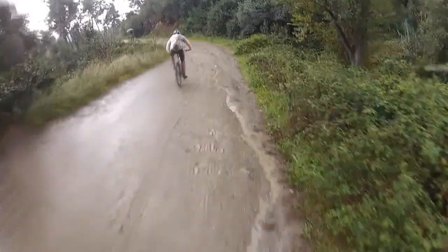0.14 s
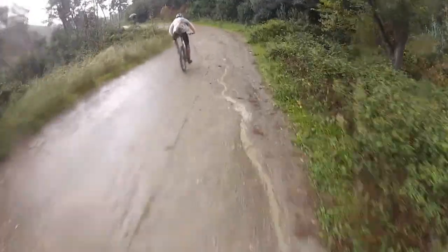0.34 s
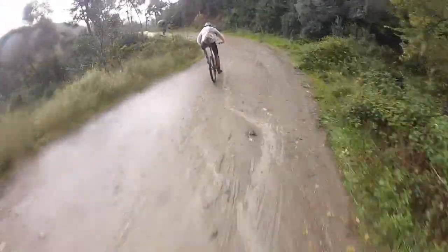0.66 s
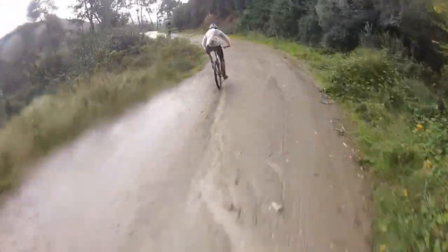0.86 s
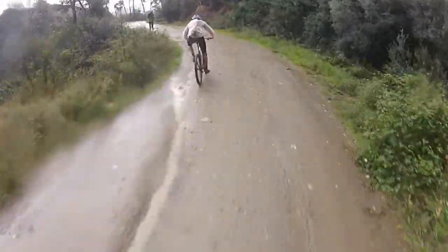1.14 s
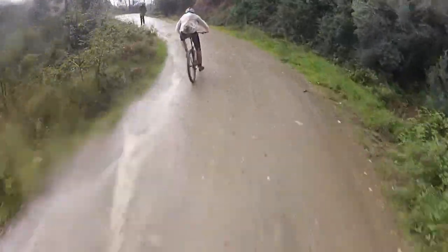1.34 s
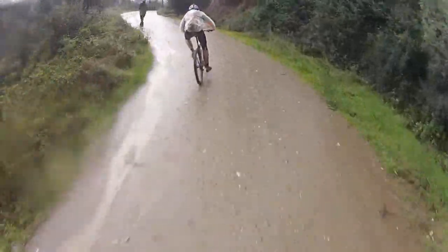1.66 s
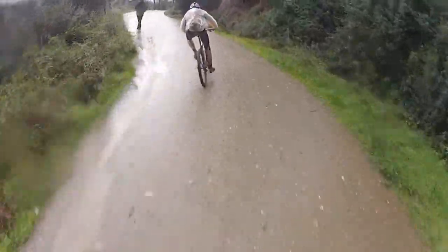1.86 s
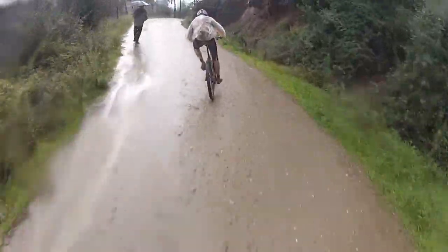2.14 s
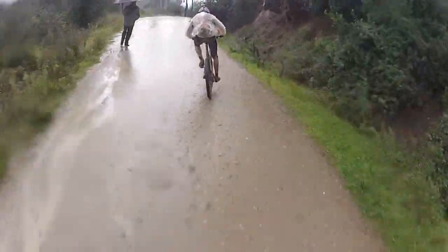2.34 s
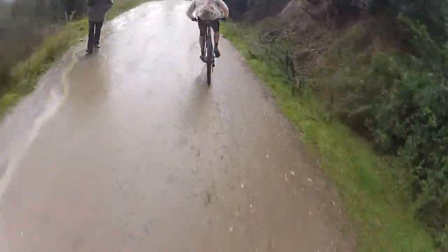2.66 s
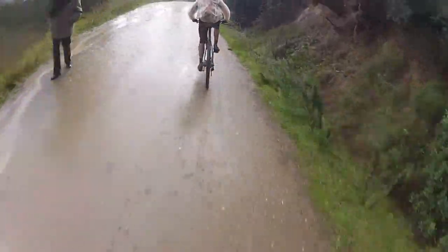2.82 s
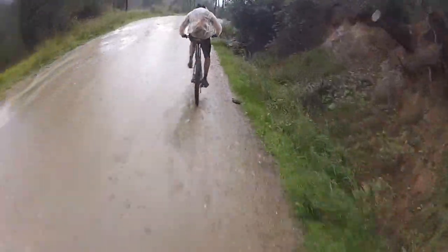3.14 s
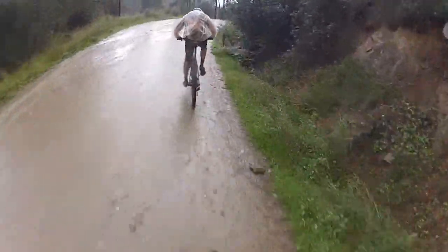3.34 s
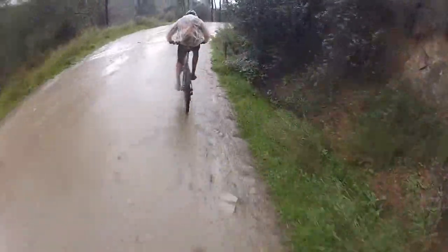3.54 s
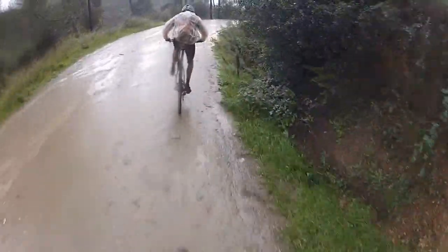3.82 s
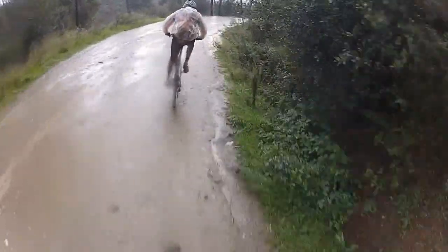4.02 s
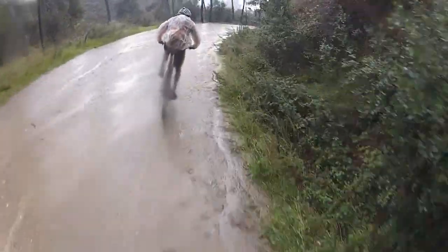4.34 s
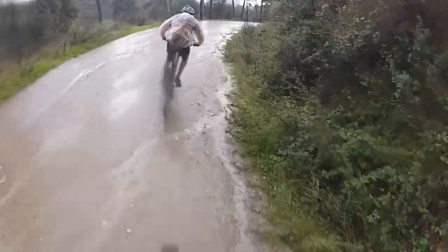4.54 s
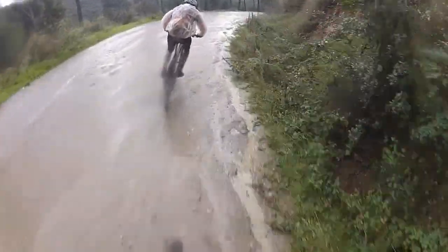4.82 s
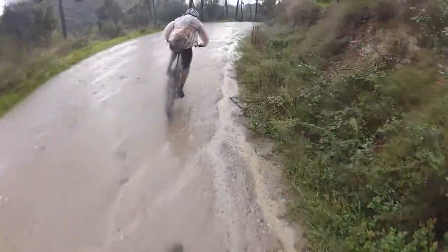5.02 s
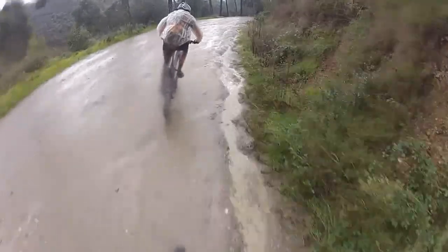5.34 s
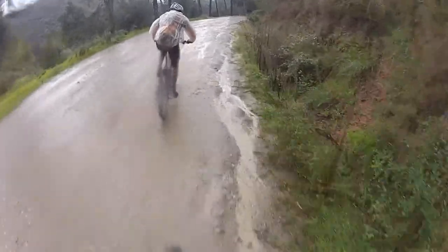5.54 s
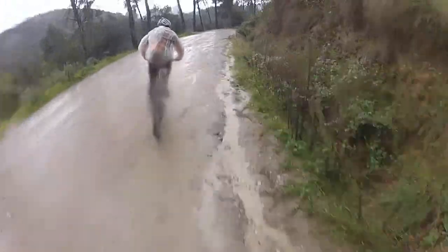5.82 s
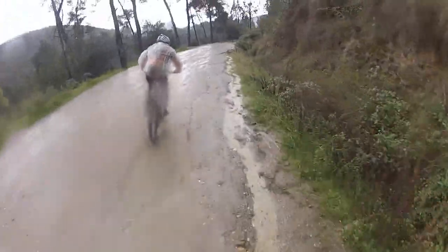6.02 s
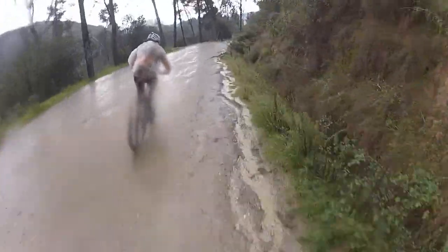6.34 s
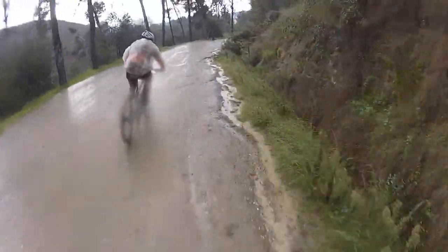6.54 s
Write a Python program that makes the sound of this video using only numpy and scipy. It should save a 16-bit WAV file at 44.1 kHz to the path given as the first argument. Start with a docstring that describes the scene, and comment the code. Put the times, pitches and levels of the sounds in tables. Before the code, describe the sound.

Heard from a microphone in a waterproof case on a moving bicycle, wet tyre spray starts loud, with a couple of dull jolts, then drops to a softer hiss. Specks of grit tick on the case throughout, and lumps of mud patter thickly in the second half. Low wind buffets come and go over the rumble of the dirt track, and several thuds close the stretch. The treble is grainy.

```python
"""Wet dirt track, one bicycle following another, heard from a small camera in a waterproof case.
Tyres hiss through the water film, rough ground rumbles and bumps thud through the mount.
Wind buffets the case; flung mud and grit tick on it.
The camera samples at 8 kHz and holds each value, which adds a gritty treble."""
import sys
import numpy as np
from scipy import signal
from scipy.fft import rfft, irfft
from scipy.io import wavfile
from scipy.ndimage import uniform_filter1d

SR = 44100
rng = np.random.default_rng(int(sys.argv[2]) if len(sys.argv) > 2 else 0)


def wrap_up_sound(samples):
    """Save the sound to the file named by the first command line argument, as 16-bit audio."""
    columns = np.atleast_2d(samples).T
    # keep every value between -1 and 1, then stretch to whole-number steps
    tamed = np.clip(columns, -1, 1)
    steps = np.round(tamed * 32767).astype(np.int16)
    wavfile.write(sys.argv[1], SR, steps)


N = 294147
TIME_S = np.arange(N) / SR


def undb(db):
    """Decibels to gain."""
    return 10 ** (np.asarray(db) / 20)


def unit(x):
    """Scale to rms 1."""
    return x / np.sqrt(np.mean(x ** 2))


def curve(table):
    """Interpolate (t/s, value) rows per sample."""
    return np.interp(TIME_S, *np.transpose(table))


def colour(x, spectrum):
    """Shape x by (f/Hz, level/dB) rows; rms 1."""
    hz, db = np.transpose(spectrum)
    bins_hz = np.maximum(np.fft.rfftfreq(N, 1 / SR), 1)
    gain = undb(np.interp(np.log(bins_hz), np.log(hz), db))
    return unit(irfft(rfft(x) * gain, N))


def band(x, hz, width_hz, order):
    """Band-pass around hz."""
    low_hz = np.hypot(hz, width_hz / 2) - width_hz / 2
    sos = signal.butter(order, [low_hz, low_hz + width_hz], "bandpass", fs=SR, output="sos")
    return signal.sosfilt(sos, x)


def walk(rate_hz):
    """Smooth random drift; rms 1."""
    hold = int(SR / rate_hz)
    steps = np.repeat(rng.standard_normal(N // hold + 1), hold)
    return unit(uniform_filter1d(uniform_filter1d(steps, hold), hold)[:N])


def ring(t, hz, t60_s):
    """Struck, decaying mode."""
    return np.sin(2 * np.pi * hz * t) * np.exp(-np.log(1000) * t / t60_s)


def add(out, start_s, sound):
    """Mix sound into out at start_s."""
    i = int(start_s * SR)
    out[i:i + len(sound)] += sound[:N - i]


def case(x, ring_db):
    """The case passes sound on and rings with it."""
    # resonances: f/Hz, width/Hz, relative level/dB
    modes = [(1010, 68, 0.5), (1234, 68, 2.5), (1680, 160, -6), (2280, 240, -10), (3594, 176, 2)]
    ringing = sum(undb(db) * signal.lfilter(*signal.iirpeak(hz, hz / width_hz, fs=SR), x)
                  for hz, width_hz, db in modes)
    return x + undb(ring_db) * ringing


def tyres(hiss_db):
    """Tread tears the water film into droplets; coarse ones crackle, stray sand ticks."""
    # spray spectrum: f/Hz, relative level/dB
    spectrum = [(300, -19), (650, -15), (850, -9), (1030, -13.5), (1200, -3), (1450, 2), (1900, 5),
                (2400, -1.5), (2900, -9), (3300, -7), (3900, -10)]
    mist = rng.standard_normal(N)
    sizes = undb(3.4 * np.minimum(rng.exponential(size=N), 5))
    droplets = (rng.random(N) < 500 / SR) * sizes * rng.choice([-1, 1], N)
    water = colour(mist + undb(-5) * unit(droplets), spectrum)
    spray = unit(case(water, ring_db=-0.5))
    grains = (rng.random(N) < 14 / SR) * rng.random(N)
    sand = unit(band(grains, 3060, 1900, order=2))
    # the dull swish on mud varies less than the spray: wetter ground is brighter
    swish = unit(band(rng.standard_normal(N), 1210, 296, order=2)) * undb(0.38 * hiss_db - 37.5)
    return (spray + undb(-19.5) * sand) * undb(hiss_db + walk(16) + 2.33) + swish


def rolling(hiss_db):
    """Rough ground shakes frame and mount: a steady part plus one that follows the hiss."""
    # rumble spectrum: f/Hz, relative level/dB
    spectrum = [(40, 0), (100, -1.5), (150, 0), (215, -0.5), (310, -8.5), (480, -14.5), (700, -18.5),
                (1100, -10.5), (2000, -81)]
    shake = np.hypot(undb(-54), undb(hiss_db - 7))
    return colour(rng.standard_normal(N), spectrum) * shake * undb(1.6 * walk(18))


def wind():
    """Eddies push on the case; gusts set their strength."""
    # eddy spectrum: f/Hz, relative level/dB
    spectrum = [(8, -8), (18, 1.5), (27, 1.5), (38, -4), (50, -7), (65, -16.5), (85, -26), (130, -32.5),
                (300, -54), (700, -96)]
    # gusts: t/s, level/dB
    gusts = [(0.0, -35), (0.34, -24.5), (0.52, -36.5), (0.92, -28), (1.36, -44.5), (1.8, -34.5),
             (2.4, -34.5), (2.6, -40), (3.48, -46.5), (3.72, -35), (4.2, -43), (4.65, -31), (4.87, -39.5),
             (5.04, -22), (5.25, -36.5), (5.79, -29.5), (6.12, -39), (6.67, -24)]
    eddies = colour(rng.standard_normal(N), spectrum)
    running_rms = np.sqrt(uniform_filter1d(eddies ** 2, int(.09 * SR)))
    buffet_db = 2.5 * walk(rate_hz=17)
    return eddies / running_rms * undb(curve(gusts) + buffet_db)


def blow(noise, hz, width_hz, crack_db):
    """One hit on the case: grit ticks high, mud plops low, each squelches as it spreads."""
    t = np.arange(len(noise)) / SR
    impact = 1. * (t == 0)
    spread_s = 0.0028 * 1500 / hz  # softer lumps flatten more slowly
    squelch = undb(-17) * noise * np.exp(-t / spread_s)
    push = band(impact + squelch, hz, width_hz, order=2)
    crack = undb(crack_db) * band(impact, 3110, 830, order=1)
    stiff_wall = signal.butter(5, 960, "highpass", fs=SR, output="sos")
    hit = case(signal.sosfilt(stiff_wall, push + crack), ring_db=0)
    return hit / np.sqrt(np.sum(hit ** 2) / (.005 * SR))  # energy of 5 ms at rms 1


def specks(hiss_db):
    """Fine specks hit the case at uneven times, harder where there is more spray."""
    rate_hz, spread_oct = 8, 0.23
    out = np.zeros(N)
    for k in range(int(rate_hz * N / SR)):
        start_s = (k + rng.random()) / rate_hz
        size_db, pitch = np.clip(rng.standard_normal(2), -2, 2)
        hz = 1800 * 2 ** (spread_oct * pitch)
        tick = blow(rng.standard_normal(SR // 25), hz, width_hz=1030, crack_db=-9)
        add(out, start_s, undb(size_db) * tick)
    return out * undb(hiss_db + 1.5)


def bumps():
    """Each jolt thuds through the mount and faintly knocks the case."""
    # jolts: t/s, level/dB, f/Hz, T60/s, knock re thud/dB
    jolts = [(0.2087, -12.5, 215, 0.044, -21.5), (0.3267, -10.5, 223, 0.026, -26),
             (5.039, -21, 221, 0.041, -34), (6.103, -9.5, 212, 0.025, -33), (6.145, -24, 142, 0.045, -34),
             (6.287, -20.5, 175, 0.036, -24), (6.507, -18.5, 145, 0.031, -30)]
    out, t = np.zeros(N), np.arange(SR // 6) / SR
    for start_s, db, hz, t60_s, knock_db in jolts:
        thud = ring(t, hz, t60_s) * (1 - np.exp(-t / 0.0029)) ** 2  # the mount gives: soft onset
        knock = ring(t, 820, 0.018) + undb(2.5) * ring(t, 1170, 0.03)
        add(out, start_s, undb(db) * (thud + undb(knock_db) * knock))
    return out


def splats():
    """Wheels fling lumps at the case; heavy ones shed a crumb that lands just after."""
    # mud and grit: t/s, relative level/dB, f/Hz, width/Hz, crack/dB
    lumps = [(0.3532, -33.5, 2100, 805, -3), (0.5664, -37, 1880, 2150, -9), (0.7644, -26, 2060, 1560, -22),
             (0.906, -37, 1770, 1570, -23), (1.1166, -37, 1560, 460, -9), (1.4696, -39, 2050, 780, -12),
             (1.5151, -31, 1860, 920, -21), (1.6421, -28.5, 1790, 1940, -28),
             (1.8335, -42.5, 2260, 420, -3), (1.913, -44, 2910, 2200, -25), (2.0203, -33.5, 2510, 690, -4),
             (2.14, -47.5, 3450, 710, -15), (2.191, -48, 1670, 1120, 4), (2.223, -45.5, 3370, 690, -4),
             (2.3558, -40, 2980, 1490, -22), (2.418, -43.5, 2040, 1480, -22),
             (3.1496, -38.5, 1920, 960, -8), (3.405, -38.5, 2010, 990, -8),
             (3.4362, -46.5, 1810, 1380, -24), (3.5804, -42, 1670, 1840, -22), (3.629, -44, 1910, 920, -17),
             (3.64, -39.5, 1940, 1070, -12), (3.8974, -44, 2100, 690, -6), (3.934, -41.5, 2180, 610, -2),
             (4.01, -30, 2110, 770, -17), (4.0348, -32.5, 1580, 1140, -35), (4.0427, -40, 2190, 750, -10),
             (4.058, -36.5, 1190, 750, -30), (4.0877, -21.5, 1590, 450, -22),
             (4.0978, -32.5, 1990, 890, -8), (4.1326, -31, 980, 1170, -24), (4.1475, -24, 1980, 1460, -37),
             (4.1784, -36.5, 1320, 970, -15), (4.5114, -35.5, 1280, 920, -10.5),
             (4.6315, -32, 1560, 880, -32), (4.6636, -29.5, 1500, 806, -30),
             (4.7318, -25.5, 1510, 820, -49), (4.7446, -35.5, 1540, 360, -15), (4.778, -29, 1180, 920, -27),
             (4.783, -29, 1760, 1180, 2.5), (4.8387, -23.5, 1750, 990, -12), (4.908, -41.5, 1940, 490, -11),
             (4.969, -37.5, 1460, 1090, -24), (4.983, -29.5, 1490, 494, -19),
             (5.0968, -37, 2480, 1200, -22), (5.109, -38, 1750, 960, -4), (5.2207, -26, 1150, 930, -24),
             (5.237, -34, 1470, 875, -18), (5.2521, -26.5, 1470, 900, -17), (5.2571, -28.5, 1290, 700, -30),
             (5.323, -29, 1730, 1220, -6.5), (5.365, -28.5, 1680, 660, -24),
             (5.4996, -42.5, 1750, 1840, -23), (5.5353, -32.5, 1750, 806, -34),
             (5.695, -43.5, 1760, 1770, -6), (5.8973, -30.5, 1930, 850, -5), (6.031, -32, 2310, 1000, -11),
             (6.1867, -43, 1750, 827, -6), (6.295, -41, 1710, 1800, -2)]
    heavy_db = -34
    out = np.zeros(N)
    for start_s, db, hz, width_hz, crack_db in lumps:
        lump, crumb = rng.standard_normal((2, SR // 25))
        lag_s = .012 * (.5 + rng.random())
        add(out, start_s, undb(db + 2.5) * blow(lump, hz, width_hz, crack_db))
        if db > heavy_db:
            add(out, start_s + lag_s, undb(db - 19) * blow(crumb, hz, width_hz, crack_db))
    return out


def sizzle():
    """A faint, narrow band of hiss swells, slides down and fades, twice."""
    # swells: t/s, length/s, first f/Hz, last f/Hz, level/dB
    swells = [(1.649, .9, 1848, 1600, -51.5), (5.998, .9, 1760, 1655, -56.5)]
    out = np.zeros(N)
    for start_s, length_s, first_hz, last_hz, db in swells:
        progress = np.clip((TIME_S - start_s) / length_s, 0, 1)
        phase = 2 * np.pi * np.cumsum(first_hz + (last_hz - first_hz) * progress) / SR
        narrow_noise = unit(walk(200) * np.cos(phase) + walk(200) * np.sin(phase))
        out += narrow_noise * undb(db) * np.sin(np.pi * progress)
    return out


def scene():
    """Mono sum at the microphone inside the case."""
    # tyre hiss, loud on the fast wet stretch, quiet on the slow one: t/s, relative level/dB
    ride = [(0.0, -40.5), (0.3, -39.5), (0.9, -40.5), (2.06, -48), (2.53, -52.5), (3.01, -55),
            (3.21, -49.5), (3.42, -56), (3.6, -53), (4.0, -56), (4.38, -54), (4.57, -55), (4.79, -50.5),
            (5.13, -54.5), (5.41, -51), (5.78, -51.5), (6.08, -47), (6.67, -48.5)]
    hiss_db = curve(ride)
    mix = tyres(hiss_db) + sizzle() + rolling(hiss_db) + wind() + splats() + bumps() + specks(hiss_db)
    return mix[None]


def record(dry):
    """The camera keeps the band under 4 kHz; sample-and-hold mirrors it into the treble."""
    sample_hz, hold_ticks, top_hz = 8000, 6, 15000
    clock_hz = hold_ticks * sample_hz
    anti_alias = signal.firwin(135, 3750, fs=SR)
    narrow = signal.fftconvolve(dry, anti_alias[None], mode="same")
    samples = signal.resample_poly(narrow, clock_hz, SR, axis=1)[:, ::hold_ticks]
    stairs = np.repeat(samples, hold_ticks, axis=1)
    held = signal.resample_poly(stairs, SR, clock_hz, axis=1)[:, :N]
    fade = np.clip(np.minimum(TIME_S, TIME_S[::-1]) / .005, 0, 1)
    low_pass = signal.ellip(8, .2, 70, top_hz, fs=SR, output="sos")
    return signal.sosfilt(low_pass, held * fade)


dry = scene()
out = record(dry)
wrap_up_sound(out)
```